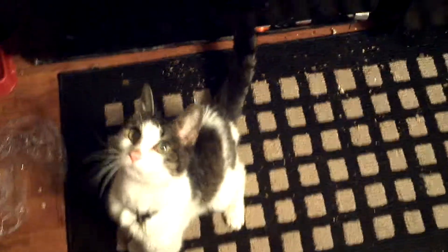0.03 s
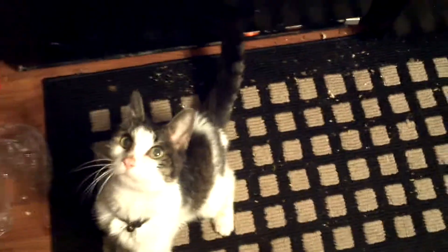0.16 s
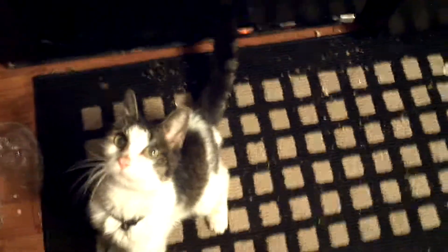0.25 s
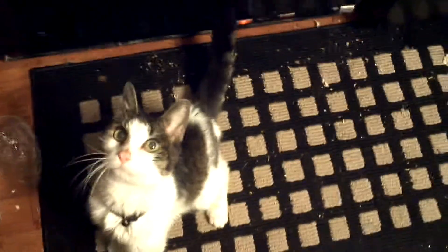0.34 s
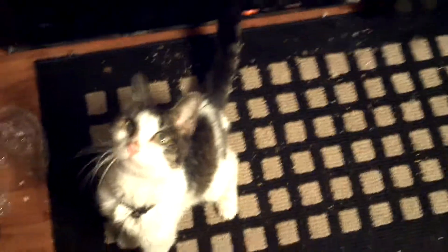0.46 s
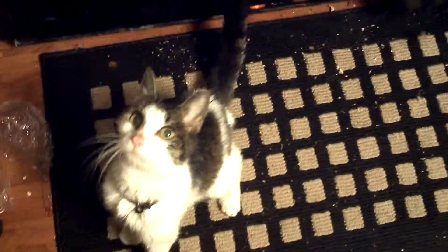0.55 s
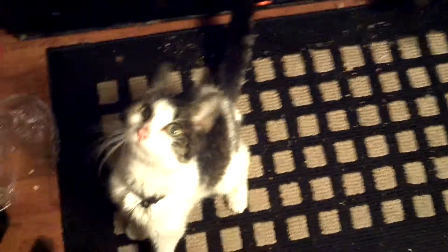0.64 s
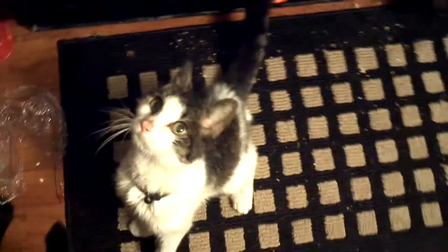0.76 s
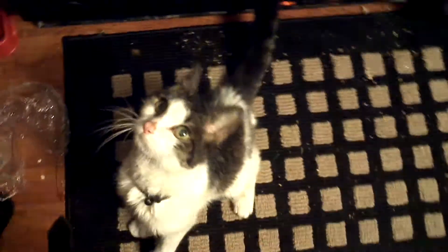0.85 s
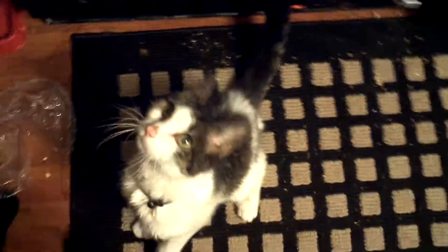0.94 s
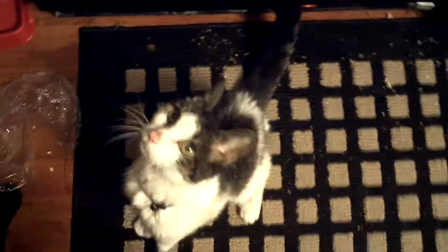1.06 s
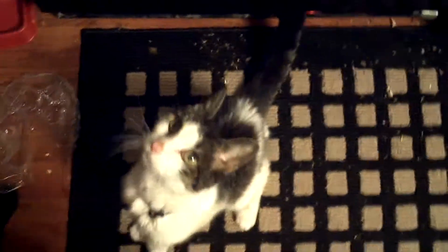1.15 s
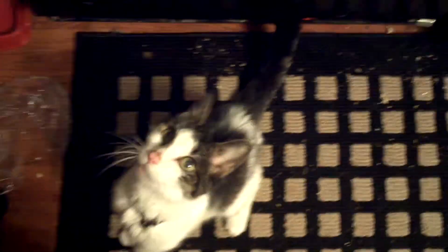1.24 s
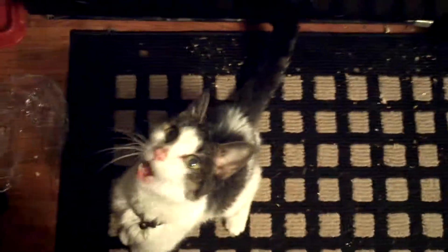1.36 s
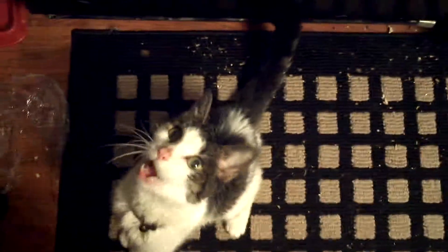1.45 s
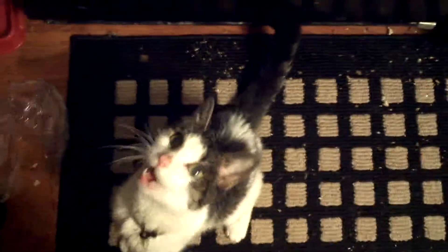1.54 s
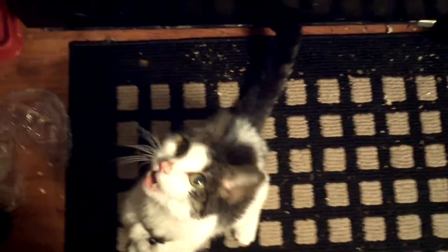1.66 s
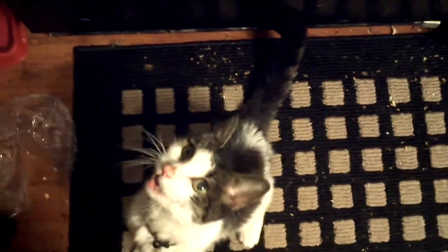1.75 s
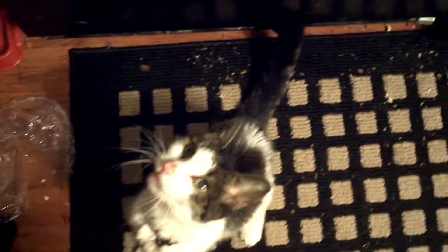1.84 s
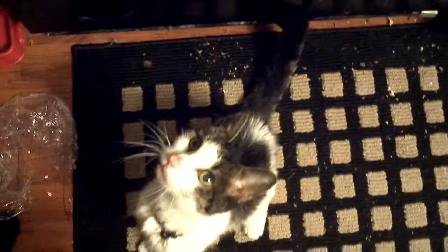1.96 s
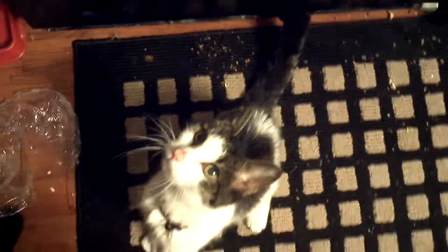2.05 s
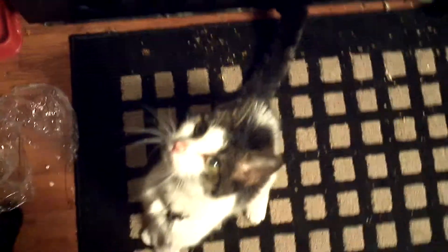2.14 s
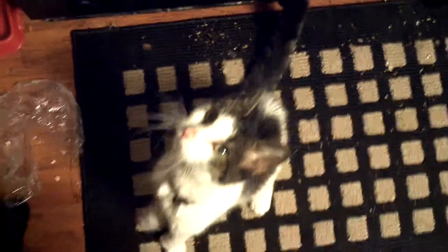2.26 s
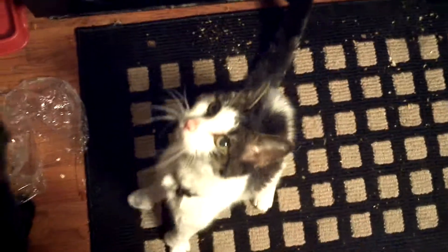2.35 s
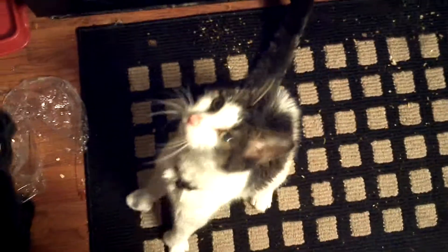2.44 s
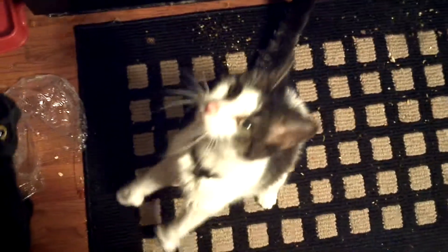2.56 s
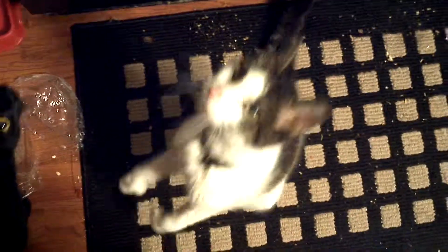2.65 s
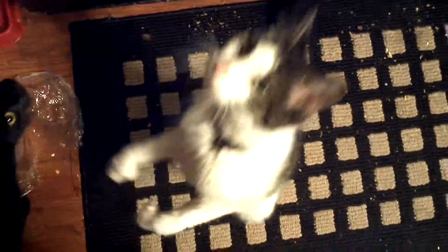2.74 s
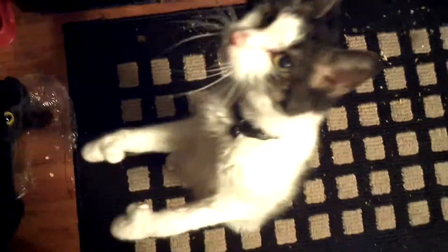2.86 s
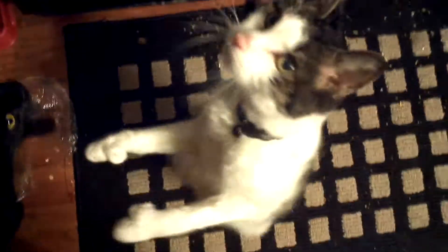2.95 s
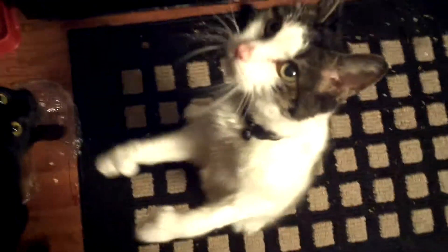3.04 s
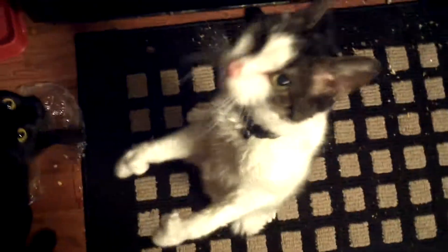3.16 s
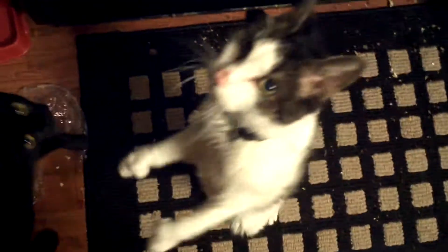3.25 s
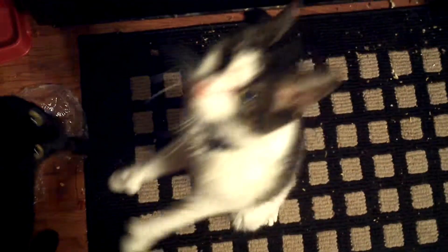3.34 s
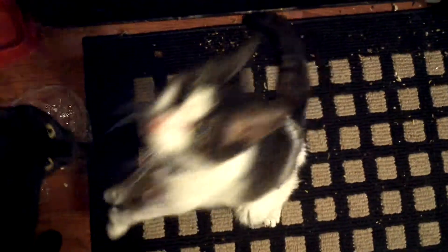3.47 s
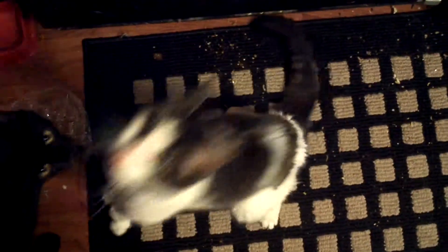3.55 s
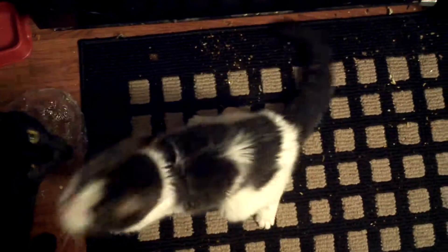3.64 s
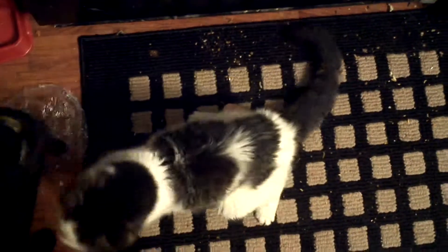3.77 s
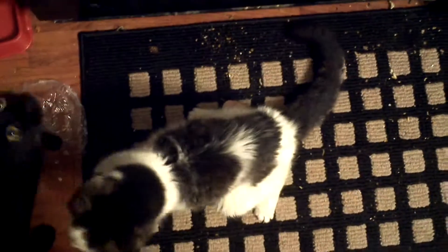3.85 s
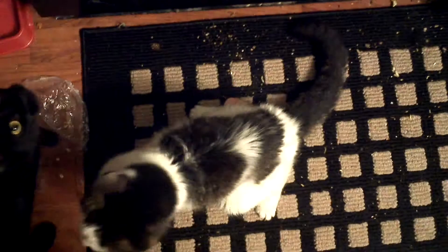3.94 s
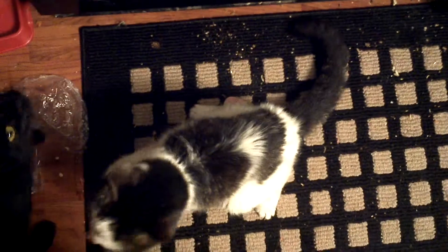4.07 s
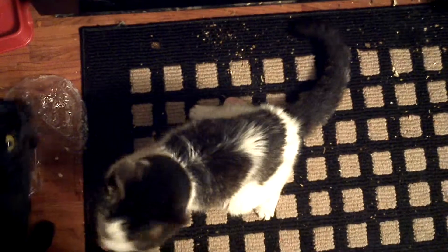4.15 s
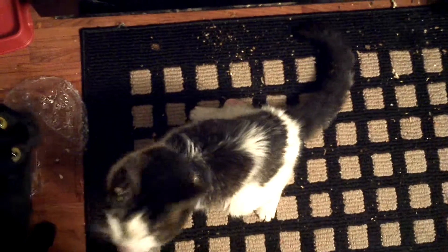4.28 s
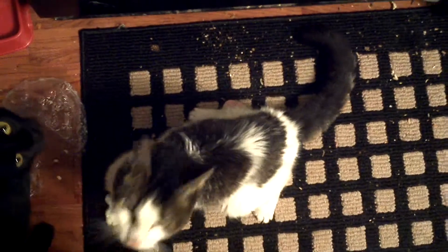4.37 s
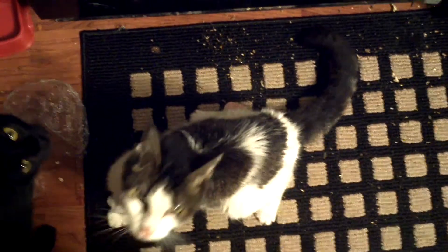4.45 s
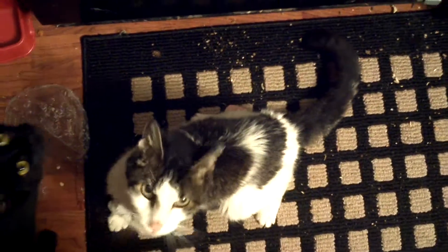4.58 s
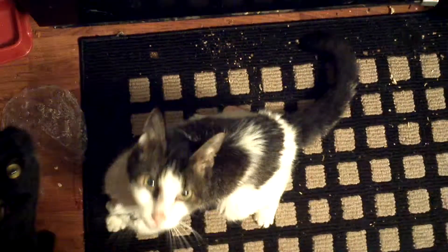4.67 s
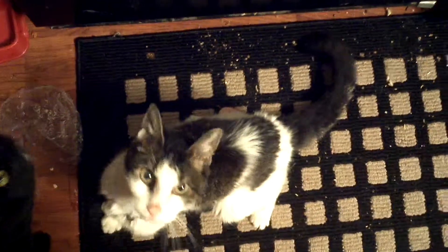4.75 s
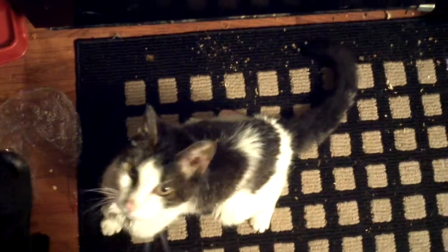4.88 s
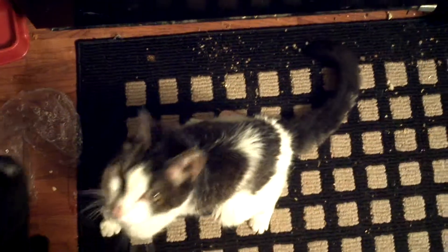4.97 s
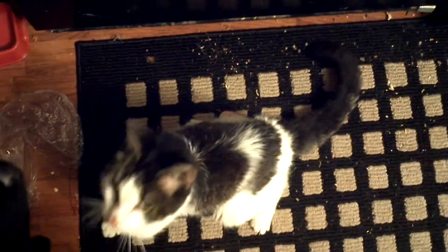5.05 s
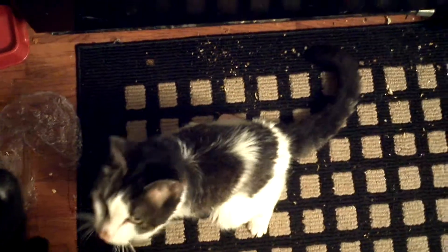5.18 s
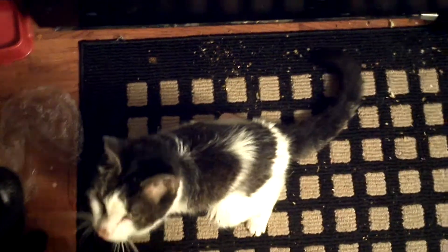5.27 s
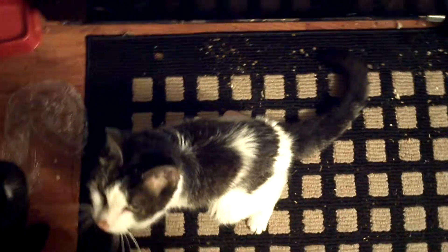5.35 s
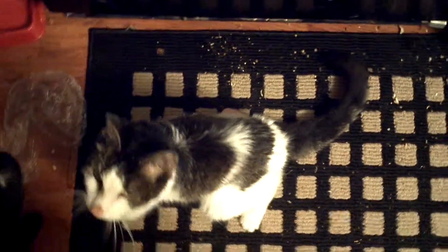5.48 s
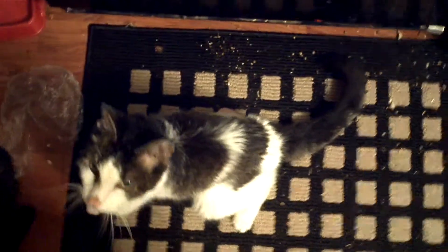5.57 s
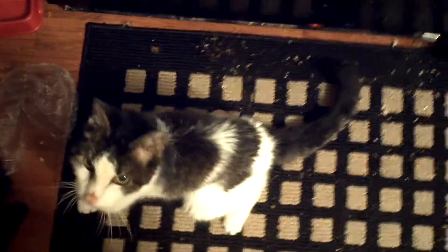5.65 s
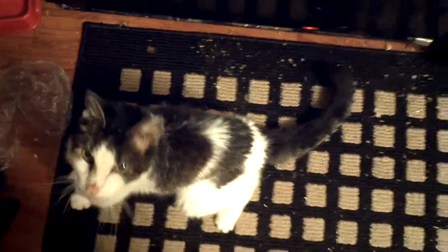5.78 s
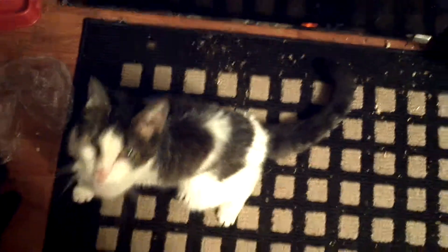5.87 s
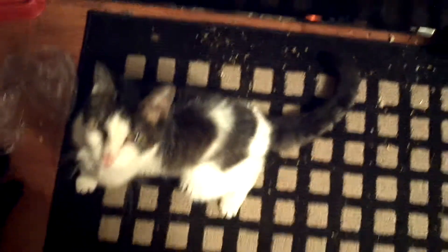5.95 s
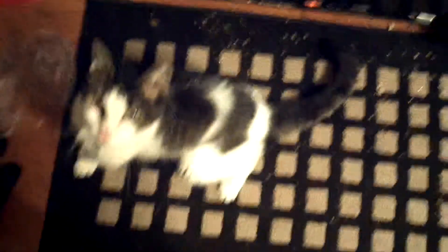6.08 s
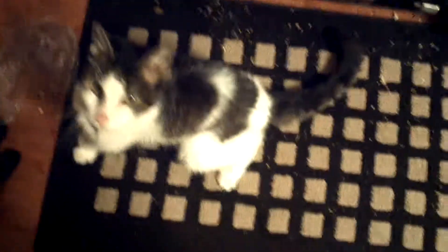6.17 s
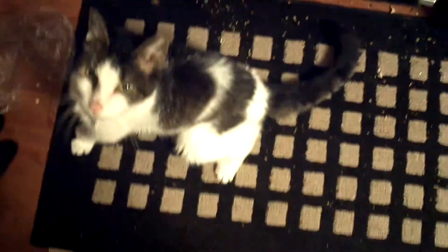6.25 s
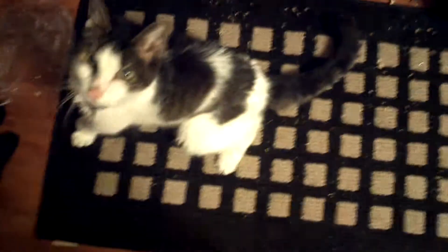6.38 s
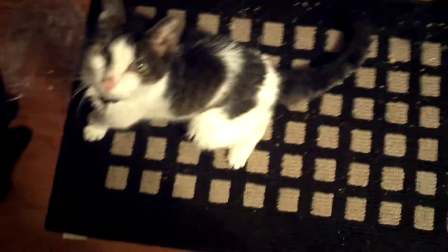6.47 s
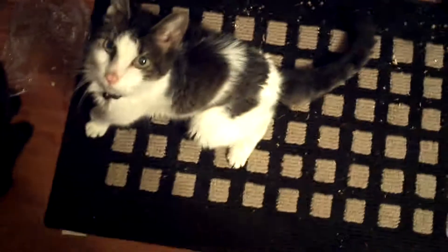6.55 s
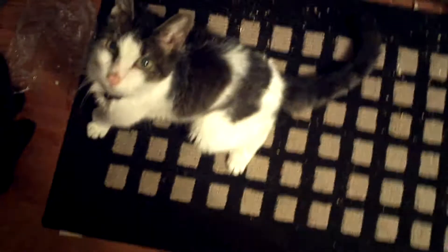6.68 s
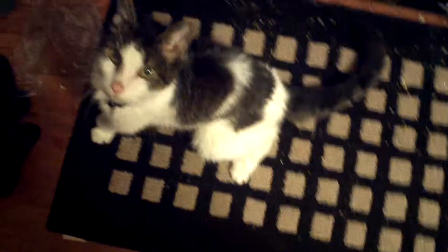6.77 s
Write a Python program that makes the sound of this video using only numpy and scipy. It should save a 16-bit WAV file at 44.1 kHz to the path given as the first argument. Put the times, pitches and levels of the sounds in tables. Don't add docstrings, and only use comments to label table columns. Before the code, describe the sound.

A small cat gives one short meow close by, swelling then falling into a fluttering trill, over faint fridge hum, distant crickets and light claw ticks.

```python
import sys
import numpy as np
from scipy import signal
from scipy.fft import rfft, irfft
from scipy.io import wavfile
from scipy.ndimage import uniform_filter1d

SR = 44100
rng = np.random.default_rng(int(sys.argv[2]) if len(sys.argv) > 2 else 0)


def wav_record(signal):
    frames = np.transpose(np.atleast_2d(signal))
    bounded = np.clip(frames, -1, 1)
    quanta = np.round(bounded * 32767).astype(np.int16)
    wavfile.write(sys.argv[1], SR, quanta)


def field_ratio(decibels):
    return 10 ** (np.asarray(decibels, dtype=float) / 20)


N = 300497


def evened(x):
    return x / np.sqrt(np.mean(x ** 2) + 1e-20)


def read(points, hz):
    f, value = np.transpose(points)
    return np.interp(np.log(hz + 1), np.log(f + 1), value)


def add(mix, start_s, sound):
    part = mix[:, round(start_s * SR):][:, :sound.shape[1]]
    part += sound[:, :part.shape[1]]


def resonate(x, hz, width_hz):
    turn = np.exp(2j * np.pi * np.cumsum(hz * np.ones(x.shape[-1])) / SR)
    r = np.exp(-np.pi * width_hz / SR)
    return 2 * (turn * signal.lfilter([1 - r], [1, -r], x / turn)).real


def resonate_twice(x, hz, width_hz):
    return resonate(resonate(x, hz, width_hz), hz, width_hz)


def drift(size, hz):
    span = max(int(SR / hz / 2), 1)
    return evened(uniform_filter1d(uniform_filter1d(rng.standard_normal(size), span), span))


def coloured(points):
    hz = np.fft.rfftfreq(N, 1 / SR)
    return irfft(rfft(rng.standard_normal(N)) * field_ratio(read(points, hz)) * np.sqrt(SR / 2), N)


def throat(drive, modes, mouth=1):
    out = 0
    for k, (hz, width_hz, db) in enumerate(modes):
        once = resonate(drive, hz * mouth, 1.27 * width_hz)
        out = out + (-1) ** k * field_ratio(db) * resonate(once, hz * mouth, 1.28 * width_hz)
    return out


def vocal_folds(hz, breath, dip):
    jitter = 0.055 * breath * drift(len(hz), 153)
    turns = np.cumsum(hz * (1 - dip + jitter)) / SR
    harmonics = (np.cos(2 * np.pi * k * turns) / (1 + (k / 29.0) ** 12) for k in range(1, 36))
    folds = evened(sum(harmonics))
    puffs = evened((0.19 + np.exp(-(turns % 1) / 0.16)) * rng.standard_normal(len(hz)))
    return folds, puffs


# [t/s, effort/dB, pitch f/Hz, mouth opening/factor on throat f]
CALL = [
    (1.21, -61.5, 274.5, 0.73),
    (1.318, -45, 278.9, 0.93),
    (1.36, -38, 286.3, 1.03),
    (1.51, -30.5, 294.7, 1.056),
    (1.599, -29.5, 297.8, 1.046),
    (1.69, -31.5, 292.1, 1.02),
    (1.8, -35.5, 275.1, 1.025),
    (1.92, -40, 248.6, 0.87),
    (1.967, -57, 239, 0.79),
]
# [t of a pitch dip/s, rate f/Hz, level dip/dB per unit depth]
TRILL = (1.725, 28.6, 35)
# [f/Hz, width/Hz, level/dB]
THROAT_LOW = [(290, 224, -17), (896, 181, 1.5), (1212, 233, 0), (1475, 300, 0)]
# [f/Hz, width/Hz, level/dB]
THROAT_HIGH = [(2050, 590, -14.5), (2494, 354, -7.5), (3315, 320, -13.5), (4420, 780, -25),
               (5610, 620, -28.5)]
# [f/Hz, width/Hz, level/dB]
THROAT_TOP = [(6550, 410, -20.5), (8140, 1450, -23)]


def meow():
    lips_open_s, lips_snap_s, shut_db = 1.325, 0.007, -12
    trill_start_s, trill_grow_s = 1.69, 0.13
    s, *columns = np.transpose(CALL)
    t = np.arange(s[0], s[-1], 1 / SR)
    effort_db, hz, mouth = (np.interp(t, s, c) for c in columns)

    shut = 1 / (1 + np.exp((t - lips_open_s) / lips_snap_s))
    late_shut = 1 / (1 + np.exp((t - lips_open_s - 0.028) / lips_snap_s))
    bright_db = 3.5 + shut_db * shut - 17.5 * (t - lips_open_s)
    trill = np.clip((t - trill_start_s) / trill_grow_s, 0, 1)
    sheen_db = -0.5 + shut_db * (late_shut - shut) - 4.6 * np.sqrt(trill)

    leak = 0.13 * np.maximum(-36.5 - effort_db, 0) * (1 - 0.41 * trill)
    breath = np.minimum(0.06 + leak + 0.2 * np.sqrt(trill), 0.75)

    dip_s, trill_hz, dip_db = TRILL
    beat = 2 * np.pi * trill_hz * (t - dip_s)
    wave = np.cos(beat) + 0.21 * np.sin(2 * beat)
    dip = (0.003 + 0.055 * trill) * wave

    folds, puffs = vocal_folds(hz, breath, dip)
    low = folds + 0.6 * breath * puffs
    high = folds + 3.0 * breath * puffs
    top = folds + (0.5 + 4 * breath) * puffs
    shine = throat(high, THROAT_HIGH) + field_ratio(sheen_db) * throat(top, THROAT_TOP)
    voice = throat(low, THROAT_LOW, mouth) + field_ratio(bright_db) * shine

    shimmer_db = 0.65 * drift(len(t), 63)
    out = np.zeros(N)
    start = round(s[0] * SR)
    out[start:start + len(t)] = -field_ratio(effort_db - dip_db * dip + shimmer_db + 7.5) * voice
    return out


# [f/Hz, level/dB]
SHADE = [(300, -0.5), (1200, -5), (2200, -11.5), (3500, -10), (8000, -31), (14000, -18)]


def at_capsules(x, lag_samples=9.97):
    hz = np.fft.rfftfreq(N, 1 / SR)
    lag = np.exp(-2j * np.pi * hz * lag_samples / SR)
    far = irfft(rfft(x) * field_ratio(read(SHADE, hz)) * lag, N)
    return np.array([x, far])


# [f/Hz, t60/s]
WALLS = [(200, 0.51), (1000, 0.15), (4000, 0.66), (12000, 0.17)]


def walls(x):
    taps = np.zeros((2, SR // 2))
    slots = np.arange(120, SR // 2 - 20, 20)
    at = slots + rng.integers(0, 20, (2, len(slots)))
    np.put_along_axis(taps, at, rng.choice([-1., 1.], at.shape), 1)
    hz, t, z = signal.stft(taps, SR, nperseg=256)
    fade = field_ratio(-60 * t / read(WALLS, hz)[:, None])
    tail = signal.istft(z * fade, SR, nperseg=256)[1]
    return signal.fftconvolve(x[None], tail / np.linalg.norm(tail[0]), axes=1)[:, :N]


def hits(rows, t60_s, lift_db, spread, snap):
    out, t = np.zeros((2, N)), np.arange(4000) / SR
    noises = rng.standard_normal((len(rows), 3, len(t)))
    for (s, db, hz, side), noise in zip(rows, noises):
        burst = (noise[0] + min(hz / 3000, 1) * noise[1:]) * field_ratio(-60 * t / max(t60_s, 0.004))
        burst += snap * (t == 0)
        ring = resonate_twice(burst, hz, spread * hz)
        side_db = 12.0 * np.clip(side, -1, 1) * np.array([[1], [-1]])
        add(out, s, field_ratio(db + lift_db + side_db) * ring / abs(ring).max())
    return out


# [t/s, peak level/dB, ring f/Hz]
TICKS = [(0.4943, -52, 7150), (0.9373, -41, 8200), (1.1445, -49, 9410), (2.823, -48, 10200),
         (5.001, -59, 9740), (5.8775, -40, 8000), (6.065, -46.5, 7700), (6.1037, -36, 7400),
         (6.125, -37, 11500), (6.138, -56, 7150), (6.1538, -51, 7340), (6.1993, -51, 7000),
         (6.2954, -39.5, 6800), (6.3226, -43, 7360), (6.3357, -42, 9200), (6.343, -41.5, 6500),
         (6.3787, -56, 7810), (6.4118, -45, 10400), (6.437, -51, 7450), (6.669, -48, 7440),
         (6.7402, -41, 7600)]


def ticks():
    rows = [(*row, 0.21) for row in TICKS]
    return hits(rows, 0.014, -4.3, 0.32, 6.6)


# [t/s, peak level/dB, ring f/Hz, side -1..1]
KNOCKS = [(.672, -48.5, 214, 0.84), (.739, -57, 250, 1), (.937, -52.5, 2730, .45), (1.019, -64, 2000, 0.61),
          (1.431, -43.5, 326, 0.35), (1.94, -42.5, 264, 0.35), (2.976, -35.5, 290, 0.019),
          (2.978, -54, 950, .1), (3.079, -48.5, 358, .1), (5.097, -53, 372, .1), (5.27, -51.5, 180, 0.7),
          (5.872, -40.5, 472, .05), (5.876, -55.5, 2830, 0.71), (6.062, -57, 397, .1),
          (6.13, -58.5, 3750, 0.26), (6.205, -48.5, 1060, .1), (6.207, -46.5, 1690, .02),
          (6.479, -56, 1220, .1)]


def knocks():
    return hits(KNOCKS, 0.042, 0.11, 0.39, 6.8)


# [t of crest/s, length/s, hiss level/dB, rumble level/dB]
RUSTLE = [
    (0.946, 0.22, -82, -56),
    (1.07, 0.19, -79, -56.5),
    (5.53, .2, -74, -61),
    (5.887, 0.083, -62.5, -54),
    (6.124, 0.07, -55, -70),
    (6.343, 0.084, -63.5, -70),
    (6.522, 0.37, -70.5, -65),
    (6.81, 0.23, -77, -82),
]


def rustle():
    t = np.arange(N) / SR
    crest_s, length_s, hiss_db, rumble_db = np.transpose(RUSTLE)[:, :, None]
    after, before = (t - crest_s) / length_s, (crest_s - t) / (0.48 * length_s)
    stroke_db = -16.5 * np.maximum(after, before)
    noise = rng.standard_normal((3, N))
    hiss = evened(resonate_twice(noise[:2], 8700, 2900)) * field_ratio(3.9 * drift(N, 160))
    rumble = evened(resonate_twice(noise[2], 330, 350))
    return hiss * field_ratio(hiss_db + stroke_db).sum(0) + rumble * field_ratio(rumble_db + stroke_db).sum(0)


def crackle(per_s=30):
    size = field_ratio(7.2 * np.minimum(rng.exponential(1, (2, N)), 3))
    size = size * (rng.random((2, N)) < per_s / SR)
    return field_ratio(-59.5) * resonate_twice(size, 13000, 7000)


# [f/Hz, density level/dB per Hz]
SHARED = [(30, -105), (60, -98), (110, -83), (250, -81), (420, -88), (700, -97), (1100, -103), (1500, -108),
          (2400, -110), (3500, -115), (5800, -118), (9300, -113), (13000, -115), (16000, -116)]
# [f/Hz, density level/dB per Hz]
APART = [(30, -112), (70, -102), (120, -96.5), (250, -94.5), (500, -98.5), (900, -100), (1300, -104),
         (2000, -107), (3500, -114), (5800, -118), (9300, -113), (13000, -115), (16000, -115)]
# [f/Hz, width/Hz, level/dB]
ROOM_MODES = [(317.7, 8.5, -60.5), (372.6, 9.2, -60.5), (533.4, 6.7, -67.5), (905, 43, -77)]
# [f/Hz, level/dB, waver/dB]
HUM = [(120.5, -68, 1.2), (177.6, -57.5, 2.07), (235, -71.5, 2), (748, -77.5, 4)]


def fridge():
    shared = coloured(SHARED) * field_ratio(0.12 * drift(N, 18))
    for hz, width_hz, db in ROOM_MODES:
        shared += field_ratio(db) * evened(resonate(rng.standard_normal(N), hz, width_hz))
    for hz, db, waver_db in HUM:
        turns = np.cumsum(hz * (1 + 0.00602 * drift(N, 5.34))) / SR
        level = field_ratio(db + waver_db * drift(N, 5.2))
        shared += level * np.sqrt(2) * np.cos(2 * np.pi * turns)
    apart = coloured(APART)
    return np.array([shared + apart, shared - apart])


# [f/Hz, width/Hz, level/dB, pulse spread/s]
CHIRP = (3895, 189, -79.5, 0.0842)
# [f/Hz, width/Hz, level/dB]
CHORUS = (4864, 490, -81.5)


def crickets():
    first_s, every_s, hurry_s = 0.016, 0.604, 0.0041
    t = np.arange(N) / SR
    k = np.arange(13)[:, None]
    pulse_s = first_s + every_s * k - hurry_s * k ** 2
    pulse = np.exp(-0.5 * ((t - pulse_s) / CHIRP[3]) ** 2).sum(0)
    out = np.zeros((2, N))
    for (hz, width_hz, db), swell in ((CHIRP[:3], pulse), (CHORUS, 1)):
        out += field_ratio(db) * swell * evened(resonate_twice(rng.standard_normal((2, N)), hz, width_hz))
    return out


def scene():
    cat = meow()
    small = ticks() + knocks()
    room = field_ratio(-10.0) * walls(cat) + field_ratio(-7) * walls(small.mean(0))
    return at_capsules(cat) + small + room + rustle() + crackle() + fridge() + crickets()


# [f/Hz, level/dB]
LIMIT = [(1400, -100), (3000, -101), (6000, -104), (9000, -103), (12000, -103), (15000, -102)]


def band_gate(x, follow=0.18, wobble_db=1.5, top_hz=15760, loud_top_hz=14700):
    mid_side = np.array([x[0] + x[1], x[0] - x[1]]) / 2
    hz, t, z = signal.stft(mid_side, SR, nperseg=2048, noverlap=1536)
    power = abs(z) ** 2
    over_db = np.maximum(10 * np.log10(power[0].sum(0) + 1e-12) + 52, 0)
    frame_db = np.repeat(wobble_db * rng.standard_normal(len(t)), 2)[:len(t)]
    rise_db = follow * over_db * (hz[:, None] / 15000) ** 2
    limit_db = read(LIMIT, hz)[:, None] - 1.2 + frame_db + rise_db
    band = np.arange(len(hz)) // 16
    band_power = np.add.reduceat(power, np.arange(0, len(hz), 16), axis=1)[:, band] / 16
    band_db = 10 * np.log10(band_power + 1e-20)
    keep = np.clip(band_db - limit_db, 0, 1) + (hz[:, None] < 1200)
    keep *= hz[:, None] < np.where(over_db > 6, loud_top_hz, top_hz)
    gated = z * np.minimum(keep, 1)
    mid, side = signal.istft(gated, SR, nperseg=2048, noverlap=1536)[1][:, :N]
    return np.array([mid + side, mid - side])


def band_limit(x):
    return signal.sosfilt(signal.butter(12, 15960, fs=SR, output="sos"), x)


def record(dry):
    delay_samples, gain = 15, 0.985
    late = np.pad(dry, ((0, 0), (delay_samples, 0)))[::-1, :N]
    mix = band_gate(dry - gain * late)
    return band_limit(mix)


dry = scene()
out = record(dry)
wav_record(out)
```